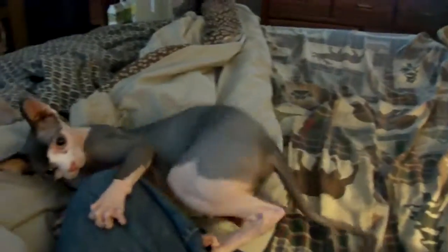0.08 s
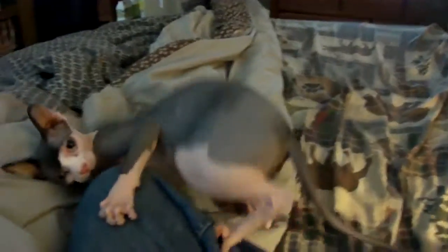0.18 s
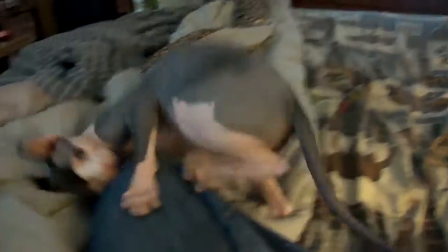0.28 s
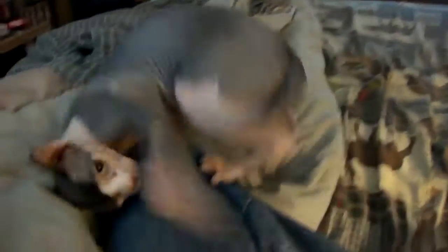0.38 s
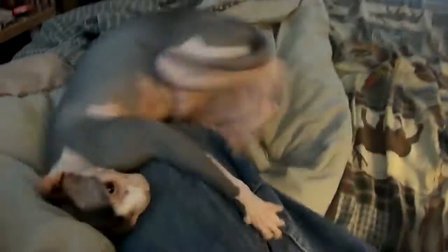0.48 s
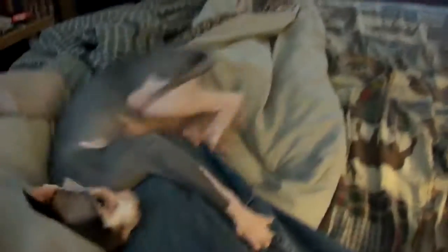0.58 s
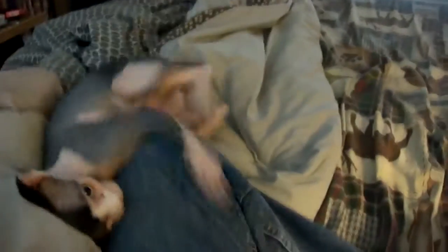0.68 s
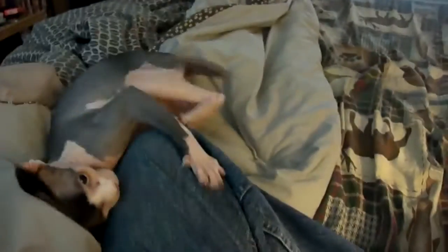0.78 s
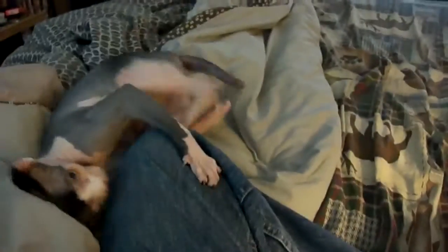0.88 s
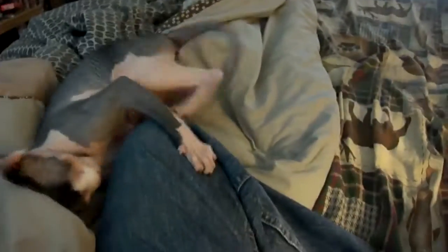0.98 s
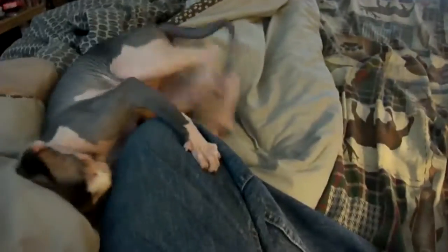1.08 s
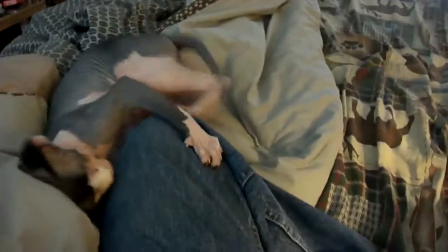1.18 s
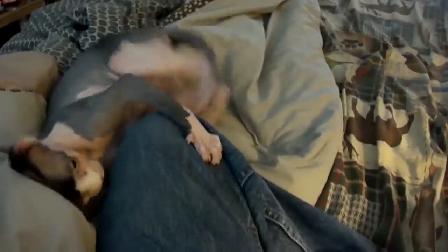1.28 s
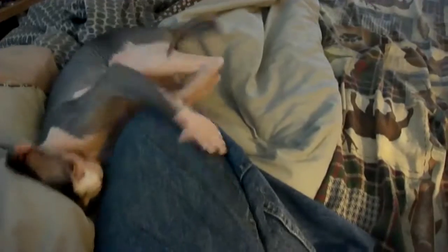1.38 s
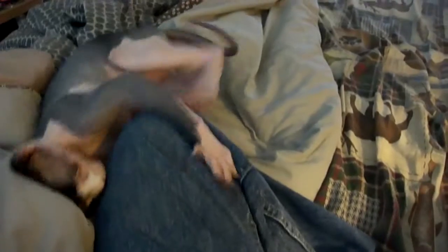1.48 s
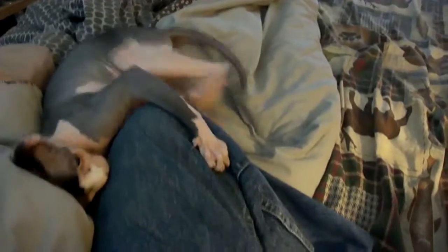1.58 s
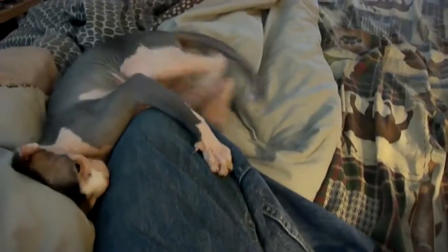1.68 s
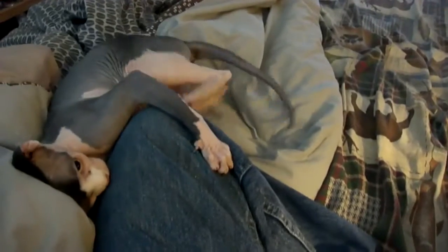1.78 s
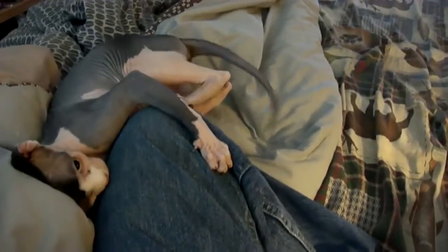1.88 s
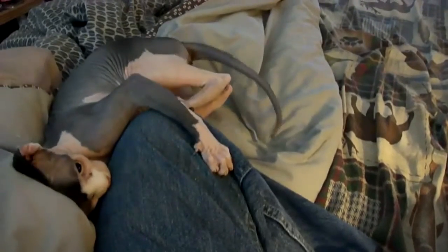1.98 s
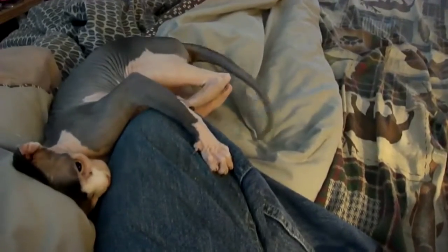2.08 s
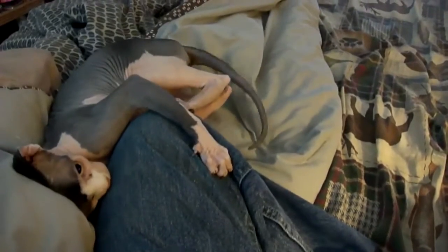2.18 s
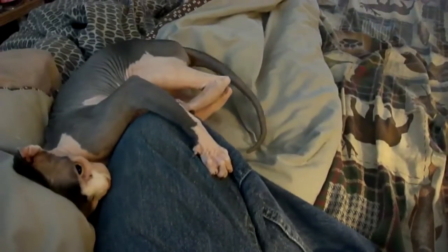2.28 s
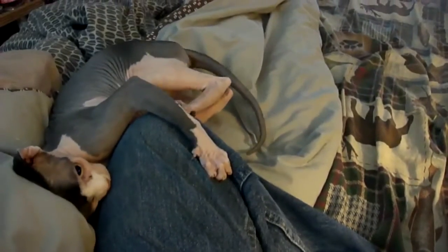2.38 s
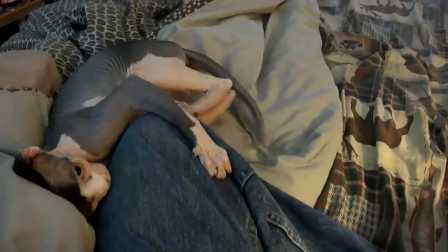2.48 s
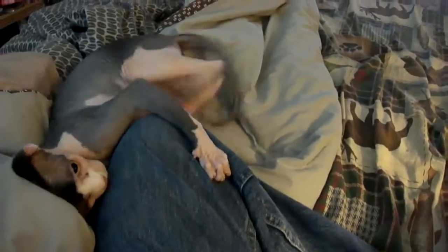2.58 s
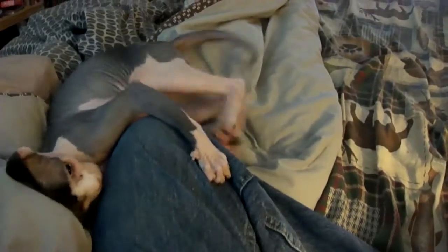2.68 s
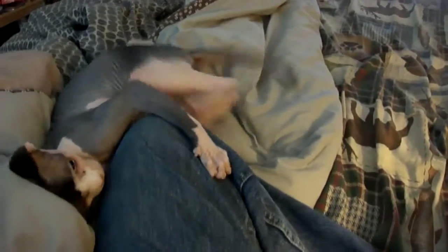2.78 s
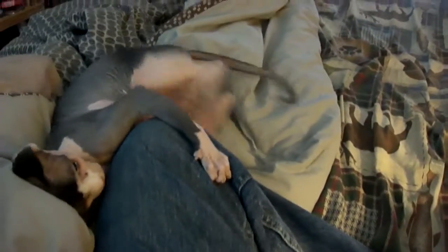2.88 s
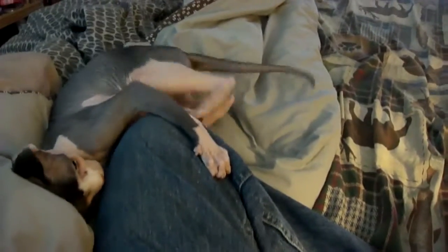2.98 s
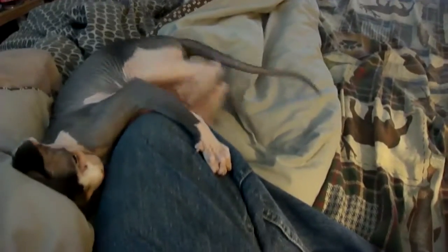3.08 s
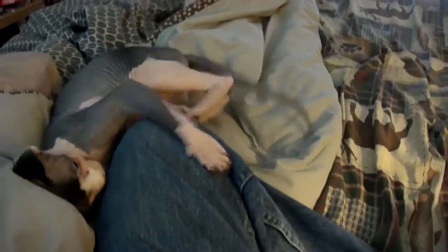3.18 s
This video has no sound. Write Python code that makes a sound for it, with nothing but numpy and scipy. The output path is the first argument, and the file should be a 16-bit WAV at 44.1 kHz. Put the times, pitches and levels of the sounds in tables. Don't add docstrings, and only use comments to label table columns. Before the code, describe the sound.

Claws plucking and scratching at jeans fabric, with soft paw thumps and rustling covers in a quiet room

```python
import sys
import numpy as np
from scipy import signal
from scipy.fft import rfft, irfft, next_fast_len
from scipy.io import wavfile
from scipy.ndimage import uniform_filter1d

SR = 44100
rng = np.random.default_rng(int(sys.argv[2]) if len(sys.argv) > 2 else 0)


def master(y):
    cut = np.clip(np.atleast_2d(y).T, -1, 1)
    pcm = np.round(cut * 32767)
    wavfile.write(sys.argv[1], SR, pcm.astype(np.int16))


def field_ratio(decibels):
    return 10 ** (np.asarray(decibels, dtype=float) / 20)


N = 143325

# start_s, peak_db, ring_hz,
# second_ring_hz, tug_db (cloth against snap)
CLAW_SNAPS = [(0.0032, -36, 2000, 5600, -3), (0.0893, -30.0, 5600.0, 3830.0, -5.0),
              (0.2066, -32.0, 1810.0, 4650.0, -5.0), (0.2224, -24, 2330, 3750, 3),
              (0.2734, -18.0, 3400.0, 5000.0, -8.0), (0.2782, -19.0, 3830.0, 5810.0, -4.0),
              (0.2968, -20.0, 3750.0, 6850.0, -15.0), (0.303, -17.0, 3660.0, 5490.0, -13.0),
              (0.3449, -1.0, 3320.0, 5210.0, -16.0), (0.4202, -13, 3360, 5900, -9),
              (0.4355, -14.0, 3920.0, 6370.0, -11.0), (0.4452, -7.0, 2630.0, 3750.0, -11.0),
              (0.541, -31.0, 3060.0, 7110.0, -1.0), (0.6235, -5, 3360, 4700, -5),
              (0.6401, -26.0, 3270.0, 5860.0, -3.0), (0.7041, -27.0, 3230.0, 6240.0, -17.0),
              (0.8679, -10.0, 4010.0, 6370.0, -27.0), (0.8725, -22.0, 4010.0, 6590.0, -11.0),
              (0.9411, -31.0, 4090.0, 2070.0, -11.0), (0.955, -2.0, 3400.0, 5100.0, -21.0),
              (1.1355, -31.0, 3790.0, 2150.0, -9.0), (1.3767, -26.0, 2630.0, 5250.0, -14.0),
              (1.4029, -9, 2330, 3750, -9), (1.4139, -20.0, 2330.0, 6800.0, -8.0),
              (1.4384, -25, 4960, 2500, -18), (1.4438, -26, 5000, 7800, -20),
              (1.5553, -20, 3850, 6000, -20), (1.5633, -18.0, 4090.0, 6460.0, -17.0),
              (1.7386, -36.0, 2800.0, 4220.0, -3.0), (2.4824, -9.0, 3620.0, 1810.0, -15.0),
              (2.7508, -31, 3900, 2000, -12), (2.9158, -21.0, 3790.0, 1890.0, -12.0),
              (2.9636, -15.0, 4440.0, 2630.0, -13.0), (2.9676, -27, 4000, 7500, -10),
              (2.9906, -30, 4500, 7500, -15), (3.0744, -30.0, 4310.0, 6500.0, -11.0)]
# freq_hz, level_db
CLAW_COLOUR = [(200, -45), (1200, -1), (2200, 0), (6500, -4), (10600, -12), (13000, -26), (16000, -41)]
RING_T60_S, RING_RISE_S, SECOND_RING_DB = .0028, .00015, -6.5
CRACK_DB, CRACK_T60_S = -11, .0045
THUD_HZ, THUD_T60_S, THUD_DB, THUD_LAG_S = 1450, .004, 2, .00055


def snap(start_s, peak_db, ring_hz, second_ring_hz, tug_db):
    t = np.arange(900) / SR
    ring = knock(t, ring_hz, RING_T60_S) - field_ratio(SECOND_RING_DB) * knock(t, second_ring_hz, RING_T60_S)
    crack = field_ratio(CRACK_DB - 60 * t / CRACK_T60_S) * rng.standard_normal(len(t))
    tick = coloured(np.minimum(t / RING_RISE_S, 1) * ring + crack, CLAW_COLOUR)
    thud = -field_ratio(THUD_DB + tug_db) * knock(np.maximum(t - THUD_LAG_S, 0), THUD_HZ, THUD_T60_S)
    return start_s - .0003, field_ratio(peak_db + .3) * (tick / abs(tick).max() + thud)


# start_s, peak_db, ring_hz
THREAD_SLIPS = [(0.2369, -23.0, 3320.0), (0.3367, -24.0, 3620.0), (0.4237, -17.0, 3060.0),
                (0.446, -10, 2650), (0.4469, -11, 2700), (0.4487, -9.0, 2670.0), (0.4494, -10, 2600),
                (0.4505, -18.0, 2840.0), (0.4971, -19.0, 3060.0), (0.4986, -19.0, 2930.0),
                (0.7057, -29.0, 4690.0), (0.9873, -26.0, 4130.0), (0.9951, -18.0, 3450.0),
                (0.9988, -17.0, 4130.0), (1.0026, -9.0, 3530.0), (1.0077, -15.0, 3490.0),
                (1.015, -12, 3600), (1.0185, -13.0, 3490.0), (1.0197, -12.0, 3450.0),
                (1.0244, -13.0, 3490.0), (1.0296, -15.0, 3450.0), (1.0322, -13.0, 3450.0),
                (1.034, -13.0, 2840.0), (1.0361, -17.0, 3060.0), (1.2709, -23.0, 2930.0),
                (1.2734, -22.0, 3360.0), (1.2751, -24.0, 3230.0), (1.3499, -28.0, 2410.0),
                (1.5782, -23.0, 3400.0), (2.4869, -18.0, 4090.0), (2.4924, -19.0, 3140.0),
                (2.4962, -20.0, 3880.0), (2.499, -17.0, 3660.0), (2.5015, -20, 3700),
                (2.5039, -20.0, 3790.0), (2.5091, -19.0, 3920.0), (2.5107, -15.0, 3920.0),
                (2.5145, -19, 3500), (2.5206, -17.0, 3010.0), (2.6115, -18.0, 4090.0),
                (2.6255, -19.0, 3320.0), (2.6282, -17.0, 3450.0), (2.6304, -15.0, 3060.0),
                (2.632, -15.0, 5000.0), (2.6339, -17.0, 2800.0), (2.6362, -12.0, 3620.0),
                (2.6426, -18.0, 3570.0), (2.6502, -20.0, 4310.0), (2.7788, -17.0, 5340.0),
                (2.7828, -14.0, 4610.0), (2.7854, -18.0, 4220.0), (2.7879, -19.0, 4010.0),
                (2.7983, -15.0, 2540.0), (2.8009, -12.0, 3660.0), (2.8057, -16.0, 4440.0),
                (2.8071, -10.0, 3620.0), (2.8084, -12.0, 3270.0), (3.1724, -25.0, 3960.0),
                (3.1898, -25.0, 3830.0), (3.2024, -22.0, 2890.0)]


def slip(start_s, peak_db, ring_hz):
    return snap(start_s, peak_db - 1, ring_hz, 1.6 * ring_hz, -30)


# fastest_s, rise_s (per 10 dB), fall_s (per 10 dB), level_db, weave_hz
PAW_SCUFFS = [(.235, .012, .005, -37, 2800), (.277, .004, .005, -30, 3000), (.365, .012, .03, -44, 3000),
              (.428, .007, .008, -26.5, 1600), (.439, .008, .008, -33, 2500), (.449, .003, .006, -26, 2500),
              (.470, .01, .01, -34, 1200), (.497, .018, .01, -31, 3000), (.646, .006, .03, -39.5, 2200),
              (.770, .035, .01, -38, 4500), (.886, .012, .012, -42, 4000), (1.033, .016, .011, -27, 3400),
              (1.272, .007, .006, -36.5, 3500), (1.352, .01, .012, -45, 3000),
              (1.422, .012, .015, -33, 2000), (1.463, .02, .014, -37, 4000), (1.558, .02, .005, -39, 3000),
              (1.592, .014, .022, -31, 3300), (2.345, .025, .04, -54, 2500), (2.474, .016, .01, -44, 3500),
              (2.511, .018, .024, -30.5, 3300), (2.635, .016, .026, -27.5, 3200),
              (2.806, .016, .013, -26, 3100), (2.840, .015, .025, -35, 2500),
              (3.002, .016, .018, -42, 2800), (3.205, .016, .018, -38, 2800)]
# freq_hz, level_db (per Hz)
WEAVE_COLOUR = [(150, -26), (500, -10), (1200, -3), (1900, -5), (3420, -1), (6000, -7), (10600, -23),
                (16000, -58)]
SLIPS_PER_S, SLIP_SPREAD_DB, HISS_SHARE = 3000, 1.8, .6
DULLING, FOCUS_DB, FOCUS_WIDTH = .24, 1.5, .55
UPPER_RATIO, UPPER_DB = 1.7, -7
BODY_HZ, BODY_WIDTH_HZ, BODY_DB, BODY_LAG_S = 1150, 1000, -7, .008
RIBS_PER_S, RIB_DECAY, HOPS_DB, HOPS_REACH = 260, .17, -13, 1.7


def fibre_patch(count, hz, width_hz):
    fibres = grit(count, SLIPS_PER_S, SLIP_SPREAD_DB, HISS_SHARE)
    return evened(resonate(resonate(fibres, hz, width_hz), hz, width_hz))


def scuff(fastest_s, rise_s, fall_s, level_db, weave_hz):
    t = np.arange(-.12, .15, 1 / SR)
    pitch = weave_hz * np.exp(-DULLING * np.clip(t / fall_s, -1, 3))
    width = FOCUS_WIDTH * weave_hz

    weave = evened(coloured(grit(len(t), SLIPS_PER_S, SLIP_SPREAD_DB, HISS_SHARE), WEAVE_COLOUR))
    bright = weave + field_ratio(FOCUS_DB) * fibre_patch(len(t), pitch, width)
    bright = evened(bright + field_ratio(UPPER_DB) * fibre_patch(len(t), UPPER_RATIO * pitch, width))

    wander = evened(uniform_filter1d(rng.standard_normal(len(t)), size=200))
    ribs = np.cumsum(RIBS_PER_S * field_ratio(3 * wander)) / SR
    hops = field_ratio(HOPS_DB) * evened(np.exp(-(ribs % 1) / RIB_DECAY))
    hops = hops * stroke(t, HOPS_REACH * rise_s, fall_s) * (t > -1.8 * rise_s)

    body = field_ratio(BODY_DB) * fibre_patch(len(t), BODY_HZ, BODY_WIDTH_HZ)
    body = body * stroke((t - BODY_LAG_S) / 1.4, rise_s, fall_s)
    return fastest_s + t[0], field_ratio(level_db) * (bright * (.92 * stroke(t, .9 * rise_s, fall_s) + hops) + body)


# start_s (where the swell peaks), peak_db, pitch_hz
CLOTH_TUGS = [(0.2787, -23, 1150), (0.3045, -29, 1200), (0.3358, -20.0, 690.0), (0.4248, -16.0, 650.0),
              (0.4278, -10.0, 900.0), (0.4301, -16.0, 860.0), (0.4344, -19.0, 1340.0),
              (0.4385, -21.0, 1340.0), (0.443, -25.0, 730.0), (0.447, -15.0, 1160.0),
              (0.4492, -16.0, 1160.0), (0.4523, -21.0, 860.0), (0.4698, -26.0, 1250.0), (0.6246, -12, 480),
              (1.0214, -25.0, 900.0), (1.0262, -25.0, 1120.0), (1.0366, -26.0, 860.0),
              (1.0399, -26.0, 1030.0), (2.5193, -25.0, 1250.0), (2.6405, -26.0, 1290.0),
              (2.6452, -24.0, 1030.0), (2.65, -23.0, 1460.0), (2.8013, -23.0, 990.0),
              (2.8049, -23.0, 1340.0), (2.8076, -23.0, 860.0), (2.8097, -22.0, 860.0)]
TUG_CYCLES = .5


def tug(start_s, peak_db, pitch_hz):
    cycles = np.arange(1500) / SR * pitch_hz
    u = cycles / TUG_CYCLES
    return start_s - TUG_CYCLES / pitch_hz, -field_ratio(peak_db - .6) * u * np.exp(1 - u) * np.sin(2 * np.pi * cycles)


# start_s, peak_db, pitch_hz
PAW_THUMPS = [
    (.3457, -23, 620),
    (.4202, -17, 560),
    (.6275, -30, 480),
    (1.4040, -30, 400),
    (2.4825, -38, 450),
]


def thump(start_s, peak_db, pitch_hz):
    t = np.arange(2000) / SR
    rise_s, t60_s = .0008, .015
    return start_s, -field_ratio(peak_db + 4) * np.minimum(t / rise_s, 1) * knock(t, pitch_hz, t60_s)


# peak_s, rise_s (per 10 dB), fall_s (per 10 dB), level_db, pitch_hz
MATTRESS_GIVES = [
    (.228, .02, .012, -38, 1000),
    (.278, .008, .012, -34, 1100),
    (.428, .008, .008, -29, 800),
    (.645, .015, .08, -41, 500),
    (.775, .02, .04, -45, 380),
    (1.06, .02, .04, -43, 2200),
    (2.492, .008, .02, -42, 400),
]


def give(peak_s, rise_s, fall_s, level_db, pitch_hz):
    t = np.arange(-.08, .2, 1 / SR)
    width = .9 * pitch_hz
    rub = resonate(resonate(rng.standard_normal(len(t)), pitch_hz, width), pitch_hz, width)
    return peak_s + t[0], field_ratio(level_db) * evened(rub) * stroke(t, rise_s, fall_s)


# time_s, level_db
WEIGHT_SHIFT = [(0.0, -49), (0.21, -48), (0.42, -42), (0.8, -47), (1.29, -49), (1.47, -46), (1.73, -52),
                (2.18, -53), (2.51, -52), (2.67, -44), (2.82, -45), (2.99, -49), (3.25, -50)]
# freq_hz, level_db (per Hz)
BEDDING_COLOUR = [(60, -30), (250, -3.5), (820, -3), (4000, -10), (7800, -20), (10900, -29), (16000, -45)]


def bedding():
    time_s, level_db = np.transpose(WEIGHT_SHIFT)
    flutter = evened(uniform_filter1d(rng.standard_normal(N), size=600))
    level = np.interp(np.arange(N) / SR, time_s, level_db) - 3 + 1.5 * flutter
    return field_ratio(level) * evened(coloured(grit(N, 900, 1.6, .7), BEDDING_COLOUR))


# freq_hz, t60_s
ROOM_DECAY = [(300, .16), (1000, .12), (4000, .09), (10000, .06)]
ECHO_DB = -23


def echo(x):
    hz, t, z = signal.stft(rng.standard_normal(SR // 4), SR, nperseg=128)
    tail = signal.istft(z * field_ratio(-60 * t / read(ROOM_DECAY, hz)[:, None]), SR, nperseg=128)[1]
    tail[:200] = 0
    return signal.fftconvolve(x, tail / np.linalg.norm(tail))[:N]


# freq_hz, level_db (per Hz)
ROOM_COLOUR = [(12, -56), (20, -26), (110, -10), (270, -13), (293, -2), (1220, -7), (4940, -22),
               (7950, -20), (16000, -52)]
ROOM_DB = -53
WHINE_HZ, WHINE_WIDTH_HZ, WHINE_DB = 7865, 60, -74


def room():
    hiss = evened(coloured(rng.standard_normal(N), ROOM_COLOUR))
    whine = evened(resonate(rng.standard_normal(N), WHINE_HZ, WHINE_WIDTH_HZ))
    return field_ratio(ROOM_DB - 2.1) * hiss + field_ratio(WHINE_DB) * whine


def grit(count, per_s, spread_db, hiss):
    hit, size, sign = rng.random(count), rng.exponential(1, count), rng.standard_normal(count)
    happens = np.clip((per_s / SR - hit) * SR / 300, 0, 1)
    slips = sign * field_ratio(spread_db * np.minimum(size, 3.5)) * happens
    clumps = evened(uniform_filter1d(rng.standard_normal(count), size=110))
    return field_ratio(1.8 * clumps) * ((1 - hiss) * evened(slips) + hiss * rng.standard_normal(count))


def stroke(t, rise_s, fall_s):
    return field_ratio(-10 * np.where(t < 0, -t / rise_s, t / fall_s) ** 1.3)


def knock(t, hz, t60_s):
    return np.exp(-np.log(1000) * t / t60_s) * np.sin(2 * np.pi * hz * t)


def resonate(x, hz, width_hz):
    turn = np.exp(2j * np.pi * np.cumsum(hz * np.ones(len(x))) / SR)
    r = np.exp(-np.pi * width_hz / SR)
    return 2 * (turn * signal.lfilter([1 - r], [1, -r], x / turn)).real


def coloured(x, points):
    log_gain = read(points, abs(np.fft.fftfreq(2048, 1 / SR))) * np.log(10) / 20
    taps = np.fft.ifft(np.exp(np.conj(signal.hilbert(log_gain)))).real[:1024]
    return signal.oaconvolve(x, taps)[:len(x)]


def read(points, hz):
    f, value = np.transpose(points)
    return np.interp(np.log(hz + 1), np.log(f + 1), value)


def evened(x):
    return x / np.sqrt(np.mean(x ** 2) + 1e-20)


def add(mix, start_s, sound):
    at = round(start_s * SR)
    part = mix[max(at, 0):][:len(sound) + min(at, 0)]
    part += sound[max(-at, 0):][:len(part)]


def scene():
    cat = np.zeros(N)
    for table, source in ((CLAW_SNAPS, snap), (THREAD_SLIPS, slip), (PAW_SCUFFS, scuff),
                          (CLOTH_TUGS, tug), (PAW_THUMPS, thump), (MATTRESS_GIVES, give)):
        for row in table:
            add(cat, *source(*row))
    cat = signal.sosfilt(signal.butter(3, 225, "high", fs=SR, output="sos"), cat)
    return (cat + field_ratio(ECHO_DB) * echo(cat) + bedding() + room())[None]


def low_pass(x):
    return signal.sosfilt(signal.butter(12, 16550, fs=SR, output="sos"), x)


def record(dry):
    gap_lo_hz, gap_hi_hz, edge_hz = 11150, 12950, 15600
    gap_db, top_db = -36, -1.2
    size = next_fast_len(N)
    hz = np.fft.rfftfreq(size, 1 / SR)
    corners = [gap_lo_hz - 150, gap_lo_hz + 250, gap_hi_hz - 150, gap_hi_hz, edge_hz, edge_hz + 200]
    response_db = np.interp(hz, corners, [0, gap_db, gap_db + 8, top_db, top_db - 4, -16])
    mix = irfft(rfft(dry, size) * field_ratio(response_db), size)[:, :N]
    return low_pass(mix)


dry = scene()
out = record(dry)
master(out)
```